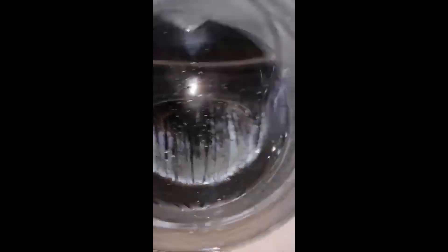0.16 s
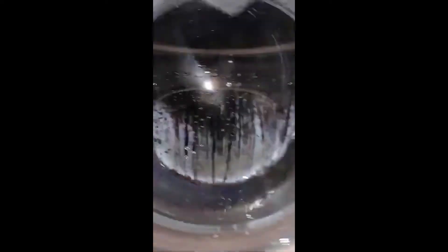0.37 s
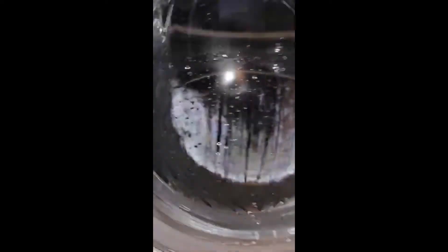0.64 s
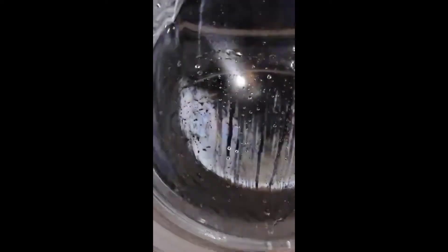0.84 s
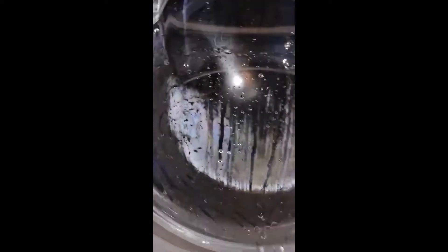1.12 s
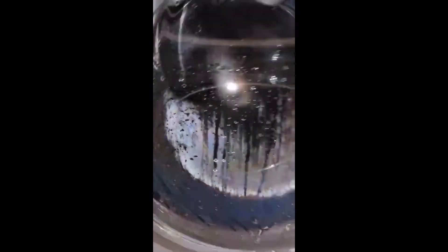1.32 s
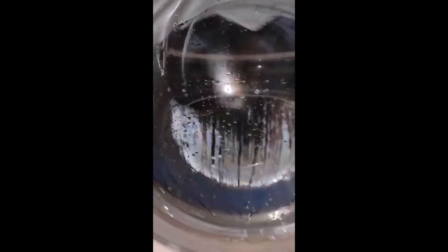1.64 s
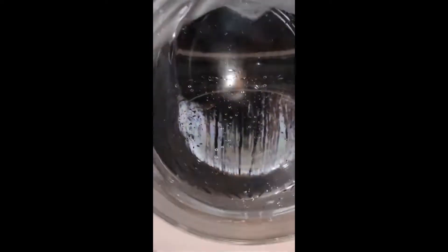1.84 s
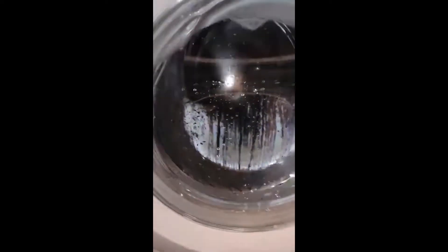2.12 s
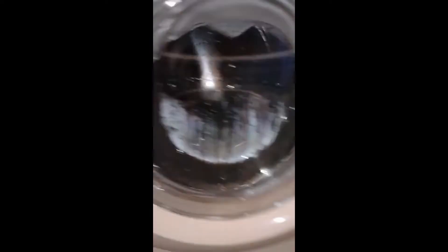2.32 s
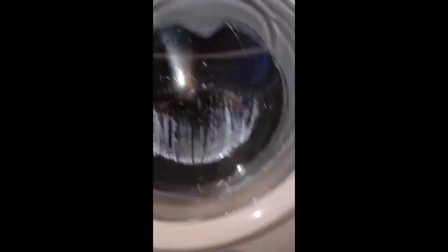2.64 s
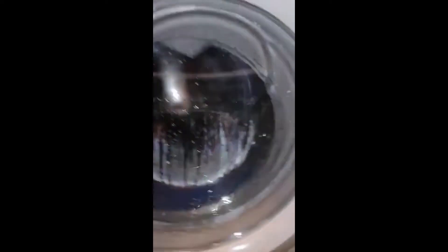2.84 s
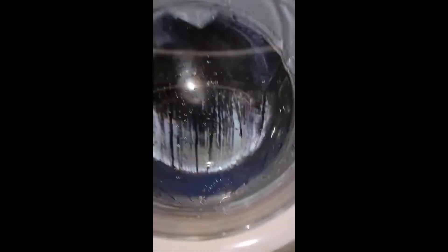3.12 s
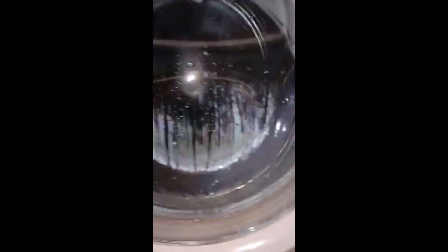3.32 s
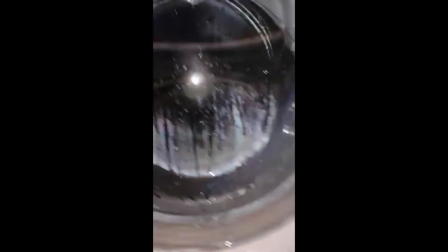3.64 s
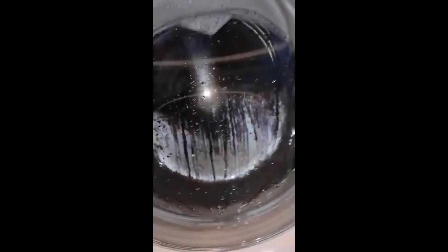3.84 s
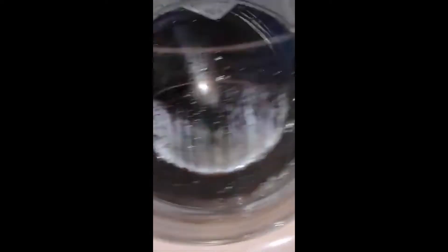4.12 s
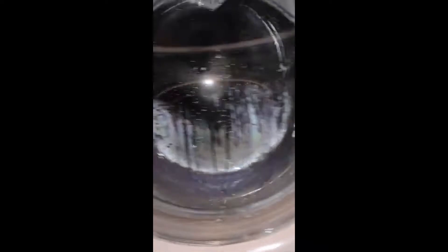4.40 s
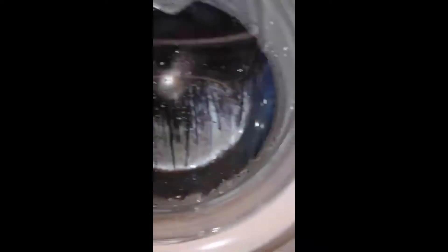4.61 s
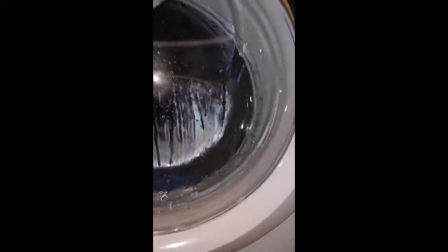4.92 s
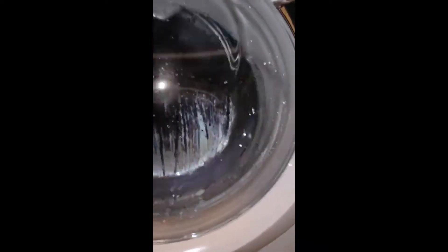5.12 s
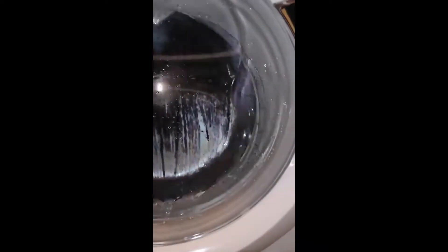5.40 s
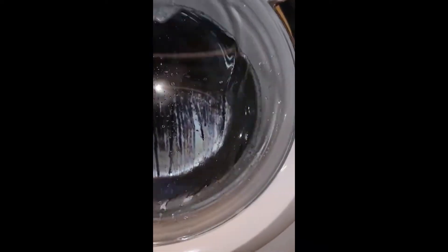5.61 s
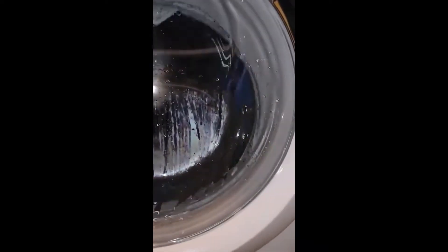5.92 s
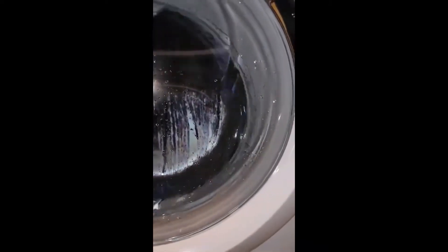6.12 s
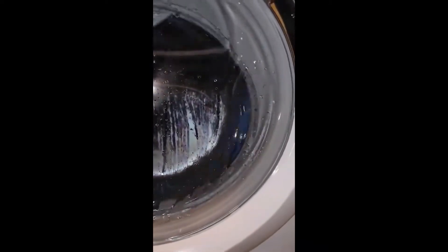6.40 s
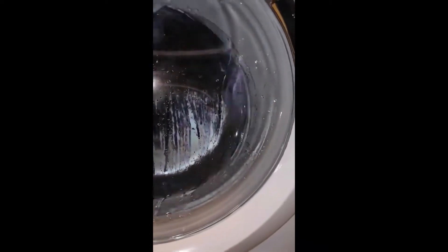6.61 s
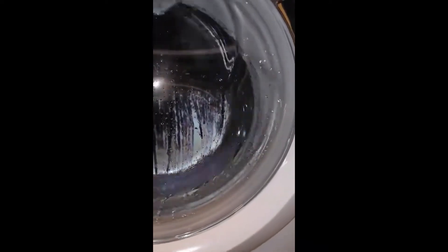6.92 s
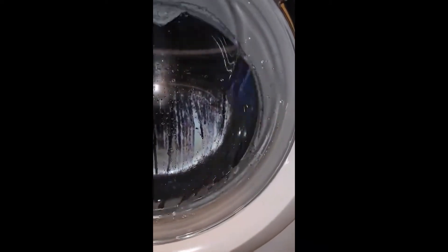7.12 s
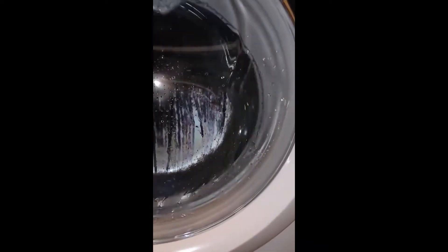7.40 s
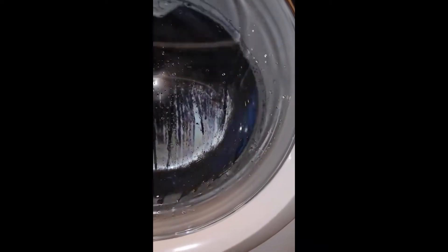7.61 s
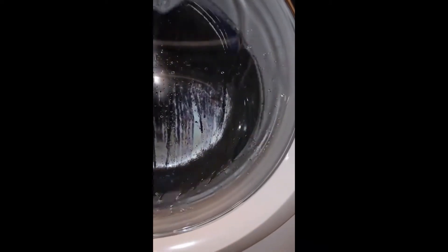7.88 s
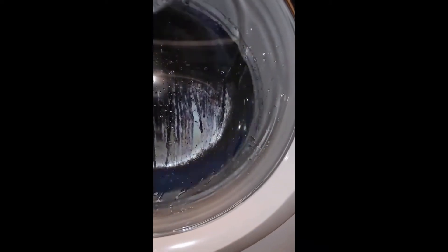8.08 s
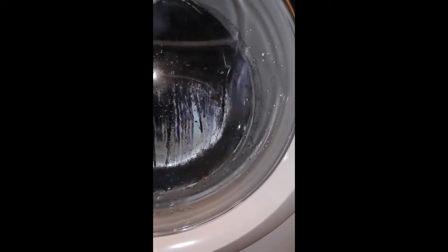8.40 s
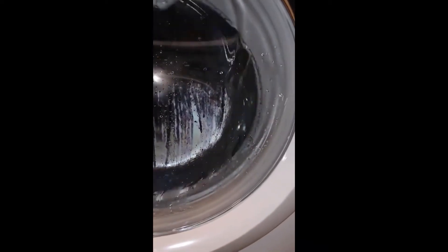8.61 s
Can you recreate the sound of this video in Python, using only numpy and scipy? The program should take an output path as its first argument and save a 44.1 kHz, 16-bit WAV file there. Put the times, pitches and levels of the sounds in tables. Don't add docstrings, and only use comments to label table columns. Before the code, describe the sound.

Fast, regular low thumps and panel rattles from a spinning washing machine, with steady high electric whine, airy roar and soft hiss.

```python
import sys
import numpy as np
from scipy import signal
from scipy.fft import rfft, irfft, next_fast_len
from scipy.io import wavfile
from scipy.ndimage import uniform_filter1d, map_coordinates

SR = 44100
rng = np.random.default_rng(int(sys.argv[2]) if len(sys.argv) > 2 else 0)


def to_linear_factor(level_db):
    exponent = np.asarray(level_db, float) / 20
    return 10 ** exponent


def generate_wav(sig):
    pcm = np.round(np.clip(np.atleast_2d(sig).T, -1, 1) * 32767).astype(np.int16)
    wavfile.write(sys.argv[1], SR, pcm)


N = 385875

DRUM_HZ, TURN_START_S = 6.679, .0485
WHINE_HZ, SWAY_HZ = 2616.5, 12.1
COMMUTATOR_BARS = 18
THUMP_DB, SLOW_DB = 0.5, .4
UNEVEN_DB, UNEVEN_S = .6, .0001
FALL_TURNS = .45
WHINE_DB, ROAR_DB, HISS_DB = -33, -33, -29.5
ROAR_AIM_DB, HISS_AIM_DB, OVERTONE_AIM_DB = -0.62, 0.5, 1
WALL_DETOUR_M, WALL_SHARE = 3.9, .85
SOUND_M_PER_S = 343
BUMP_T60_S = 0.057
LOW_CUT_HZ = 45
LAG_S = 14 / SR
STRIDE = 64

# (t/s after the turn starts, f/Hz, level/dB, t60/s)
FRAME_MODES = [(.014, 154.3, -16.5, 0.31), (.025, 80.7, -24, .14), (.032, 60, -34, .5),
               (.043, 160, -31.5, .34), (.076, 101.3, -35.5, 0.36), (.090, 181.2, -34.5, 0.74),
               (.119, 200, -22.5, 0.02), (.121, 137.7, -25.5, 0.32), (.131, 215.1, -23.5, .36),
               (.141, 199.5, -27, 0.26), (.146, 88.6, -33, 0.45)]
# (t/s after the turn starts, f/Hz, level/dB, t60/s)
PANEL_MODES = [
    (.001, 231, -28.5, .24),
    (.021, 310, -17, 0.071),
    (0.038, 397, -35.5, 0.23),
    (.041, 334.5, -30.5, 0.38),
    (0.063, 407, -58, 0.059),
    (.075, 278.5, -27.5, 0.23),
    (.081, 320.9, -33, 0.28),
    (.145, 299, -23.5, 0.079),
]
# (t/s after the turn starts, f/Hz, level/dB, t60/s, second blow over first/dB)
TRIM_MODES = [(.001, 510, -36.5, 0.18, -9), (.002, 850, -35, 0.18, -7.5), (.003, 796, -34, 0.099, -6),
              (.005, 725, -23.5, 0.11, -11), (.006, 671, -29.5, 0.1, 1.5), (.008, 935, -36, 0.11, 4),
              (-.009, 646, -33.5, 0.2, -1), (-.006, 550, -32.5, 0.096, -1), (.030, 634, -29, 0.11, -8),
              (.042, 719, -29, 0.091, -16), (.045, 536.3, -33.5, 0.085, -9)]
# (multiple of the whine f, level/dB)
OVERTONES = [(1.5, -15), (2, 3), (2.5, -7.5), (3, 5), (4, -6), (5, -13), (6, -31)]
ECHO_BEATS = (-3, -2, -1, 1, 2, 3)
# (t/s, left microphone/cm, right microphone/cm)
HAND_DRIFT = [(0.0, 9.5, 15), (0.3, 12, 14.3), (0.6, 2.5, 10.9), (0.9, 2.5, 11.6), (1.2, 5.5, 9),
              (1.5, 4, 13), (1.8, -2, 9.9), (2.1, 0.3, 12), (2.4, 1, 14), (2.7, 6.5, 14.8), (3.0, 4, 7.5),
              (3.3, 1, 10), (3.7, 9.5, 10), (4.2, 3.5, 11.6), (4.7, 10, 17.8), (5.5, 10, 14.6),
              (7.0, 11.5, 17.1), (8.75, 10.5, 16.6)]
# (t/s, aim from -1 at the door to 1 at the motor)
PHONE_AIM = [
    (0, -1.2),
    (.6, 0.88),
    (2.2, 0.71),
    (3.2, 0.86),
    (4.3, .8),
    (5.5, -0.85),
    (7.5, -0.73),
    (8.75, -1.2),
]
# (t/s, peak level/dB, f/Hz, deep thud level/dB)
PHONE_BUMPS = [
    (2.014, -33, 151, -3),
    (2.084, -11, 126, -17),
    (2.841, -10, 126, -19),
    (2.924, -13, 130, -25),
    (2.974, -12, 126, -24),
    (3.023, -13, 126, -26),
    (3.095, -12, 115, -9),
    (4.789, -25, 131, -15),
]
# (f/Hz, level per Hz/dB)
RUMBLE_SPECTRUM = [(25, -40), (45, 5.5), (100, -2), (155, 11), (200, 1), (250, -2), (330, -3.5), (380, -32),
                   (500, -21.5)]
# (f/Hz, level per Hz/dB)
ROAR_SPECTRUM = [(300, -18), (380, -8.5), (480, -5), (580, -12), (720, -2.5), (780, -7.5), (845, -3),
                 (890, -7.5), (950, -5.5), (1050, -11), (1700, -13), (2300, -15), (2800, -45), (4000, -120)]
# (f/Hz, level per Hz/dB)
HISS_SPECTRUM = [(1800, -74), (2500, -5), (2750, -6.5), (2930, -27), (3150, -10), (4700, -15), (5100, -4),
                 (6500, -4.5), (7900, -1), (8500, -7), (10500, -7), (13200, -17), (15000, -16),
                 (15900, -30)]
# (f/Hz, correlation)
LIKENESS = [(60, 0.79), (200, 1), (330, 1), (420, 0.073), (1500, 0.29), (3000, 0.05), (5500, 0.13),
            (9000, 0.17)]
# (f/Hz, left over right level/dB)
LEFT_OVER_RIGHT = [(60, -2), (110, -2), (200, -1), (380, 0), (700, -3), (1290, -4.5), (2380, -2.5),
                   (4400, 0), (8120, -1), (15000, 3.5)]


def cabinet():
    starts = 1 + TURN_START_S + np.arange(-3, 59) / DRUM_HZ
    out = np.zeros((2, N + 3 * SR))
    t = np.arange(SR // 3) / SR
    for delay, hz, db, t60 in knocks():
        chance = rng.standard_normal((len(starts), 2))
        shift = (hz / 600) ** 2 * rng.standard_normal() * np.array([[.5], [-.5]])
        onset = 1 - np.exp(-t / 0.0049)
        ring = np.sin(2 * np.pi * hz * t + shift) * to_linear_factor(db - 60 * t / t60) * onset
        sizes = to_linear_factor(UNEVEN_DB * (0.5 + hz / 500) * chance[:, 1])
        times = starts + delay + UNEVEN_S * chance[:, 0]
        for at, size in zip(np.round(times * SR).astype(int), sizes):
            out[:, at:at + len(t)] += size * ring
    return out[:, SR:SR + N] * to_linear_factor(THUMP_DB + SLOW_DB * wobble(2.81))


def knocks():
    rising = [(s, hz, db, t60) for s, hz, db, t60, more_db in TRIM_MODES]
    fall_s = FALL_TURNS / DRUM_HZ
    falling = [(s + fall_s, hz, db + more_db, t60) for s, hz, db, t60, more_db in TRIM_MODES]
    return FRAME_MODES + PANEL_MODES + rising + falling


def turns():
    return (np.arange(N) / SR - TURN_START_S) * DRUM_HZ


def whine():
    phase = motor_phase() + np.cumsum(2.25 * wobble(18)[0]) / SR
    lift_db = OVERTONE_AIM_DB * curves(PHONE_AIM)[0]
    apart = np.exp(1j * (4.14 + .5 * wobble(1.376)) * [[.5], [-.5]])
    out = to_linear_factor(WHINE_DB) * standing_wave() * echoes(0.22) * apart * np.exp(2j * np.pi * phase)
    for multiple, db in OVERTONES:
        level = to_linear_factor(db - 34.5 + lift_db + 0.94 * wobble(1.42, channels=2))
        out = out + level * echoes(0.11 * multiple) * np.exp(2j * np.pi * multiple * phase)
    return out.real


def motor_phase():
    return np.cumsum(WHINE_HZ + SWAY_HZ * sway()) / SR


def sway():
    return -np.sin(2 * np.pi * (turns() - .03))


def standing_wave():
    drift_m = np.array(curves(HAND_DRIFT)) / 100
    cycles = (WHINE_HZ * drift_m + SWAY_HZ * sway() * WALL_DETOUR_M) / SOUND_M_PER_S
    return abs(1 + WALL_SHARE * np.exp(2j * np.pi * cycles))


def echoes(depth):
    def drift(rate):
        return slow_chance(rate, channels=2) + 1j * slow_chance(rate, channels=2)

    angle = 2 * np.pi * turns()[::STRIDE]
    beats = sum(drift(2.22) * np.exp(1j * k * angle) for k in ECHO_BEATS)
    gain = 1 + depth * beats + 0.22 * drift(30)
    mean_power = uniform_filter1d(abs(gain) ** 2, size=230, axis=1)
    return stretched(gain / np.sqrt(mean_power))


def bumps():
    out = np.zeros(N + SR)
    t = np.arange(SR // 4) / SR
    rise = 1 - np.exp(-(t / 0.0036) ** 2)
    for s, db, hz, thud_db in PHONE_BUMPS:
        knock = np.sin(2 * np.pi * hz * t) * to_linear_factor(-60 * (t / BUMP_T60_S) ** 1.83)
        thud = np.sin(2 * np.pi * 58 * t) * to_linear_factor(thud_db - 60 * t / 0.36)
        start = round(s * SR)
        out[start:start + len(t)] += to_linear_factor(db + 2.0) * rise * (knock + thud)
    return out[:N] * to_linear_factor([[-1.1], [1.1]])


def rumble():
    level_db = THUMP_DB - 34.5 + 2.7 * swell(0.14) + SLOW_DB * wobble(4.5)
    return to_linear_factor(level_db) * rush(RUMBLE_SPECTRUM, patchy_db=0.0)


def roar():
    level_db = ROAR_DB + ROAR_AIM_DB * curves(PHONE_AIM)[0] + 0.077 * wobble(6.2)
    pass_db = 0.68 * swell(0.22) + 2.1 * swell(0.032) ** 8
    return to_linear_factor(level_db + pass_db) * rush(ROAR_SPECTRUM, patchy_db=1.0)


def hiss():
    shaft = 2 * np.pi * motor_phase() / COMMUTATOR_BARS
    flutter = .5 * np.sin(shaft) + 0.22 * np.sin(2 * shaft)
    level_db = HISS_DB + HISS_AIM_DB * curves(PHONE_AIM)[0] + 0.18 * wobble(42)
    return to_linear_factor(level_db + 0.3 * swell(0.35) + 0.39 * flutter) * rush(HISS_SPECTRUM, patchy_db=1.35)


def swell(at):
    return np.cos(2 * np.pi * (turns() - at))


def rush(spectrum, patchy_db):
    z = signal.stft(rng.standard_normal((2, N)), nperseg=512)[2]
    field = uniform_filter1d(rng.standard_normal(z.shape[1:]), size=6, axis=0)
    field = uniform_filter1d(field, size=10, axis=1)
    pair = signal.istft(z * to_linear_factor(patchy_db * unit(field)), nperseg=512)[1][:, :N]

    def mid_side(hz):
        spread = np.arccos(np.clip(along(LIKENESS, hz), -1, 1)) / 2
        return to_linear_factor(along(spectrum, hz)) * np.array([np.cos(spread), np.sin(spread)])

    mid, side = filtered(pair, mid_side)
    return unit(np.array([mid + side, mid - side]))


def unit(x):
    return x / np.sqrt(np.mean(x ** 2) + 1e-20)


def along(points, hz):
    f, v = np.transpose(points)
    return np.interp(np.log(hz + 1), np.log(f + 1), v)


def curves(rows):
    s, *cols = np.transpose(rows)
    return [np.interp(np.arange(N) / SR, s, c) for c in cols]


def filtered(x, response):
    m = next_fast_len(N + SR // 2)
    return irfft(rfft(x, m) * response(np.fft.rfftfreq(m, 1 / SR)), m)[..., :N]


def wobble(rate, channels=1):
    return stretched(slow_chance(rate, channels))


def slow_chance(rate, channels):
    knots = rng.standard_normal((channels, 600))
    places = np.arange(0, N, STRIDE) * rate / SR
    return np.array([map_coordinates(k, [places]) for k in knots])


def stretched(rows):
    return np.array([np.interp(np.arange(N), np.arange(len(row)) * STRIDE, row) for row in rows])


def scene():
    return cabinet() + whine() + bumps() + rumble() + roar() + hiss()


def low_pass(x):
    return signal.sosfilt(signal.butter(12, 15730, fs=SR, output="sos"), x)


def record(dry):
    def microphones(hz):
        ratio = hz / LOW_CUT_HZ
        low_cut = abs(ratio ** 2 / (1 + 1.4j * ratio - ratio ** 2))
        tilt = to_linear_factor(along(LEFT_OVER_RIGHT, hz) / 2)
        late = np.exp(-2j * np.pi * hz * LAG_S)
        return low_cut * np.array([tilt * late, 1 / tilt])

    return low_pass(filtered(dry, microphones))


dry = scene()
out = record(dry)
generate_wav(out)
```